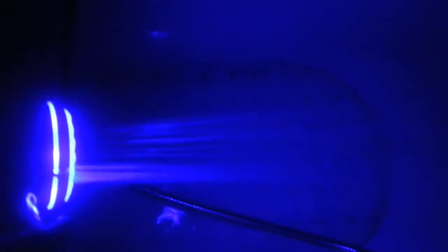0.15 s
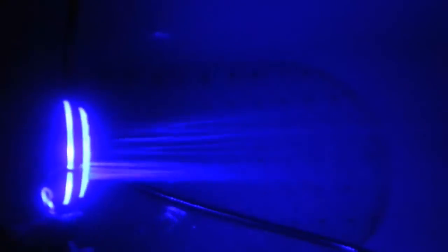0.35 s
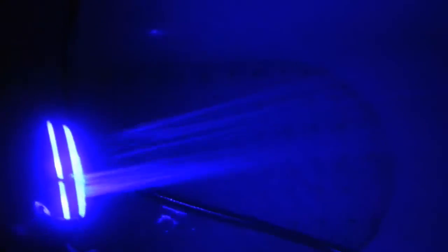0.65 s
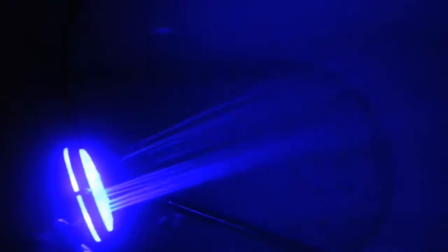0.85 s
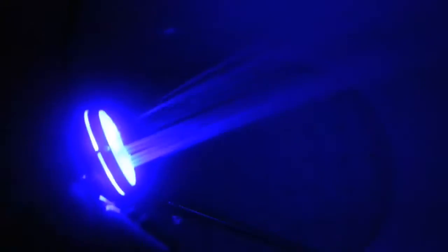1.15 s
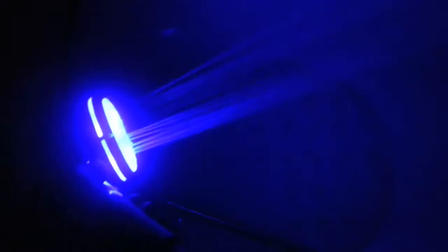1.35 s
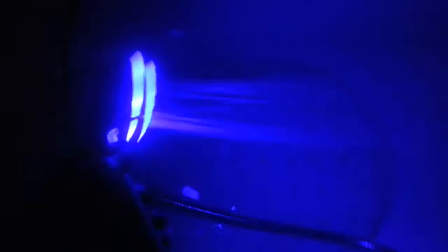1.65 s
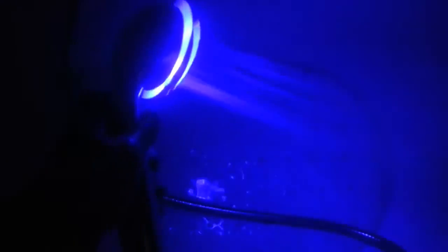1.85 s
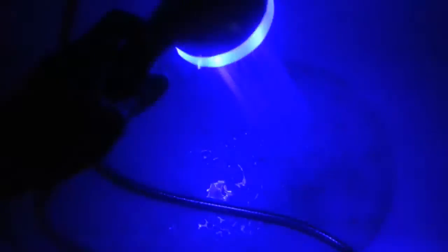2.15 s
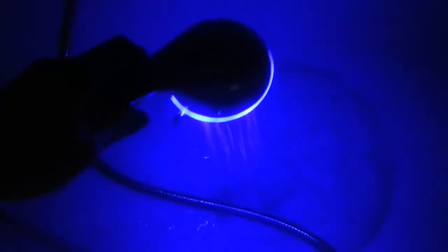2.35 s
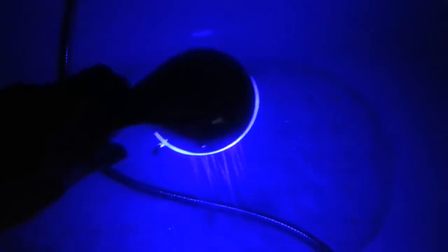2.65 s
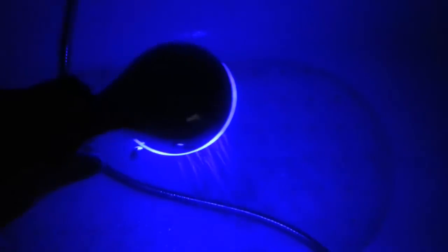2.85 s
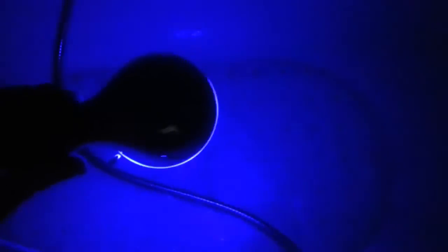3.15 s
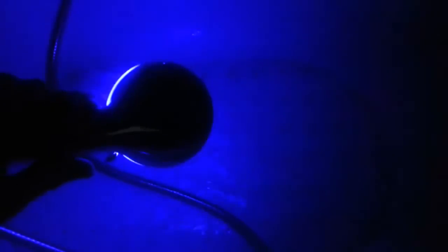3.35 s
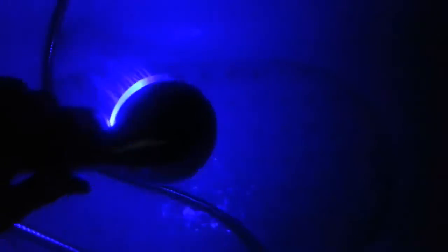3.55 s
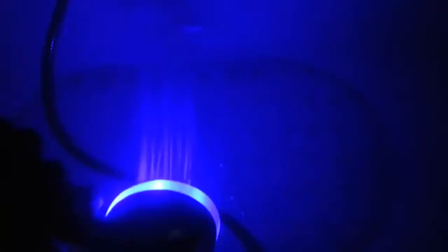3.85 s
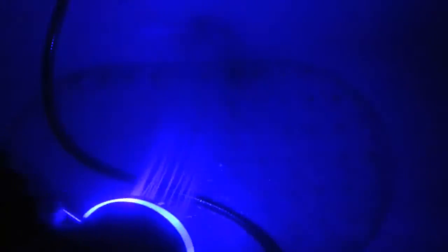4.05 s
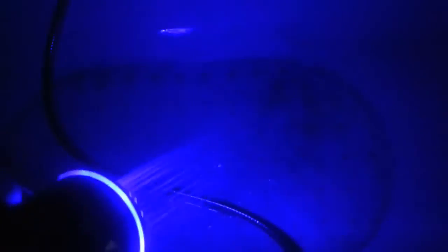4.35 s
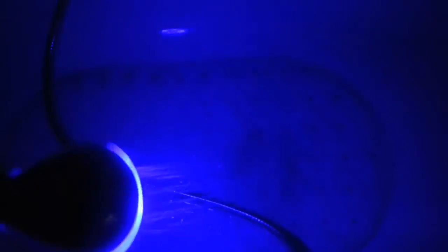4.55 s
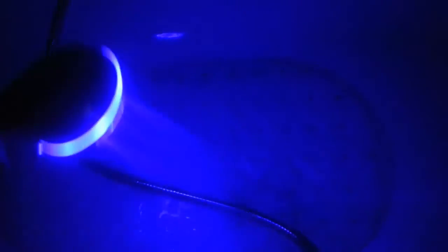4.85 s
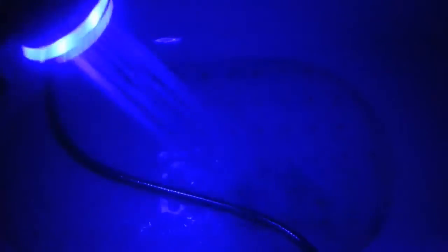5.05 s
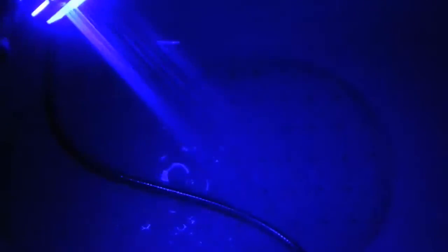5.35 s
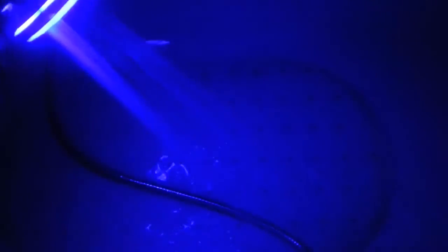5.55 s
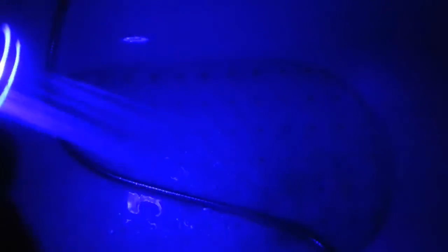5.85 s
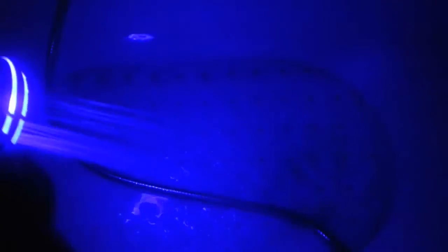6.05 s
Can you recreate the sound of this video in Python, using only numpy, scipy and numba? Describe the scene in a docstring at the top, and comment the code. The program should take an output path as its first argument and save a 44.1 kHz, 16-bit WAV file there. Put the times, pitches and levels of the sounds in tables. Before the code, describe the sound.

A shower head sprays into a bathtub close to a phone microphone. A bright, grainy hiss runs throughout, calmer until about two seconds, then louder surges as the jets sweep round. Hollow rolls drum on the tub, the hose knocks most clearly near two seconds, and short spurts spit. The sound leans right.

```python
"""Shower head over a bathtub

A hand-held shower head is swung over a bathtub with a rubber mat, close to a phone's microphone.
Noise made of random drops hisses in half-octave bands and swells as the jets sweep past; short spurts spit out.
The same kind of noise drums in the tub modes nearest the wetted spot, and noise bursts and blunt pushes make
the hose knock on the wall. Noise in two resonances hums as the head swings round; a drifting sine whines faintly."""
import sys
import numpy as np
from scipy import signal
from scipy.fft import rfft, irfft, next_fast_len
from scipy.io import wavfile
from scipy.ndimage import uniform_filter1d
from numba import njit

SR = 44100
rng = np.random.default_rng(int(sys.argv[2]) if len(sys.argv) > 2 else 0)


def transcribe(signal):
    """Save signal, clipped to [-1, 1], as a 16-bit WAV file at the path in sys.argv[1]."""
    frames = np.atleast_2d(signal).T
    limited = np.clip(frames, -1, 1)
    pcm = np.round(limited * 32767).astype(np.int16)
    wavfile.write(sys.argv[1], SR, pcm)


N = 273420


def undb(db):
    """Amplitude ratio of a level in dB."""
    return 10 ** (np.asarray(db) / 20)


def unit(x):
    """Scale to an RMS of 1 over all channels."""
    return x / np.sqrt(np.mean(x ** 2))


def curves(table):
    """Columns of a table joined by straight lines in time."""
    s, *columns = np.transpose(table)
    return [np.interp(np.arange(N) / SR, s, column) for column in columns]


def on_log(table, hz):
    """Read a table of (Hz, value) along a logarithmic frequency axis."""
    table_hz, values = np.transpose(table)
    return np.interp(np.log(hz), np.log(table_hz), values)


@njit
def svf(x, hz, width):
    """State-variable band-pass, gain 1 at a centre that may move."""
    y, band, low = np.empty(len(x)), 0., 0.
    for i in range(len(x)):
        g, damping = np.tan(np.pi * hz[i] / SR), width / hz[i]
        v = (band + g * (x[i] - low)) / (1 + g * (g + damping))
        band, low, y[i] = 2 * v - band, low + 2 * g * v, damping * v
    return y


def ring(x, hz, width):
    """The same resonance on both channels."""
    return np.array([svf(channel, hz * np.ones(len(channel)), 1. * width) for channel in x])


def walk(rate):
    """Random levels held 1 / rate s and slewed twice; spread near 1."""
    hold = int(SR / rate)
    steps = np.repeat(rng.standard_normal(N // hold + 1), hold)
    return 1.48 * uniform_filter1d(uniform_filter1d(steps, hold), hold)[:N]


def bumps(table):
    """Power of each event on a millisecond grid: up to its peak and down again, straight in dB."""
    s, peak_db, rise_s, fall_s = np.transpose(table)[:4, :, None]
    late = np.arange(0, N / SR + .001, .001) - s
    drop_db = 10 * np.where(late < 0, -late / rise_s, late / fall_s)
    return undb(2 * (peak_db - drop_db))


def smooth(x):
    """From the millisecond grid to samples."""
    return np.interp(np.arange(N) / SR, np.arange(len(x)) * .001, x)


def blend(level_db, colour, events):
    """Events add their power to an underlying sound; the louder one sets the colour (pitch or treble)."""
    power, bump = undb(2 * level_db), bumps(events)
    total = power + smooth(bump.sum(axis=0))
    event_colour = smooth(np.transpose(events)[4] @ bump)
    return 10 * np.log10(total), (power * colour + event_colour) / total


# How alike the two sides of the microphone hear the water.
# Each row: frequency in Hz, shared part of the power from 0 to 1.
STEREO_LIKENESS = [(125, .05), (250, .42), (1200, .42), (2200, .1), (5000, .02)]


def pair(own, shared, hz):
    """Left and right share part of their sound, more in the low middle."""
    likeness = np.clip(on_log(STEREO_LIKENESS, hz), 0, 1)
    return np.sqrt(1 - likeness) * own + np.sqrt(likeness) * shared


def water(per_s, spread_db, tail_s, drop_db):
    """Single drops, each a short noise burst, over the blur of countless fine ones: left, right, shared."""
    chance = rng.random((2, N))
    # the nozzles limit the size
    size_db = np.minimum(-spread_db * np.log(1 - chance[1]), 4 * spread_db)
    hits = (chance[0] < per_s / SR) * undb(2 * size_db)
    decay = np.exp(-2 * np.log(1000) / (tail_s * SR))  # 60 dB down after tail_s
    power = signal.lfilter([1], [1, -decay], hits)
    return rng.standard_normal((3, N)) * np.sqrt(1 + undb(2 * drop_db) * power / power.mean())


# The spray between swells, landing close to the microphone.
# Each row: time in seconds, level in dB, lift of the treble in dB, lift of the middle in dB, left minus right in dB.
SPRAY_BETWEEN_SWELLS = [(0, -34, 3.5, 0, -4), (.3, -37, 1, 1.5, -4.5), (.55, -35.5, 1.5, -0.5, -3.5),
                        (1.0, -40.5, 4, 0.5, -5), (1.5, -41.5, 5, 0.5, -5), (1.88, -44.5, 12, 3.5, -4),
                        (2.23, -39, 13, 2.5, -4), (2.8, -36, 2.5, 4.5, -5.5), (3.1, -39.5, -2, 1.5, -5.5),
                        (3.48, -38.5, 5, 0, -6), (3.75, -38, 5, 2.5, -5.5), (4.0, -42, 5, 1, -6.5),
                        (4.47, -47.5, 20, 4, -6), (4.7, -41, 3.5, 5, -6), (4.95, -39, 2.5, 5, -5.5),
                        (5.3, -39, 3, 3, -5), (5.5, -41.5, 1, 4, -5), (5.72, -42.5, 5, 2, -5.5),
                        (6.2, -41.5, 10, 4, -5)]
# Swells as the jets sweep past; rise and fall are the times over 10 dB.
# Each row: peak time in seconds, peak level in dB, rise in seconds, fall in seconds, lift of the treble in dB.
SWEEP_SWELLS = [(.25, -35.5, .04, 0.16, 8), (.37, -33.5, 0.11, 0.17, 2), (.57, -37.5, 0.044, 0.36, 5),
                (1.68, -37.5, 0.39, 0.16, -0.5), (2.05, -27, 0.067, 0.12, 2.5), (2.35, -30, 0.076, 0.08, 0),
                (2.5, -34, 0.061, 0.18, -3), (2.7, -35.5, 0.08, 0.31, 1), (2.97, -32.5, 0.056, 0.2, 3.5),
                (3.13, -35.5, 0.032, .08, 4), (3.28, -28, 0.13, 0.11, 1.5), (3.39, -31.5, 0.12, 0.12, -1),
                (3.53, -32.5, 0.049, 0.076, -1.5), (3.595, -33, 0.084, 0.078, 1),
                (4.07, -35.5, 0.029, 0.25, 6), (4.16, -33.5, 0.12, 0.41, 2), (4.52, -33.5, 0.036, 0.22, 3),
                (4.64, -34.5, 0.025, 0.12, 6), (5.28, -35.5, 0.047, 0.075, 1), (5.8, -35, 0.082, 0.24, 0),
                (6.02, -36.5, 0.027, 0.19, -0.5)]
# Underlying colour of the hiss before the lifts. Each row: frequency in Hz, relative density in dB per Hz.
HISS_COLOUR = [(20, -11.5), (332, -15), (516, -16.5), (572, -17.5), (843, -9.5), (1040, -11), (2080, -5),
               (2310, -4.5), (3300, -1), (4250, 3), (5150, 0), (6340, -5), (12400, -8), (14500, -8)]
SWELL_LOW_DB, SWELL_BASS_DB = -1, -2  # a swell is lighter in the middle and in the bass


def spray():
    """Half-octave bands of spatter; swells add to the underlying spray with their own colour."""
    between_db, treble_db, low_db, pan_db = curves(SPRAY_BETWEEN_SWELLS)
    total_db, mist_db = blend(between_db, treble_db, SWEEP_SWELLS)
    swell_share = 1 - undb(2 * (between_db - total_db))
    splash_db = low_db + SWELL_LOW_DB * swell_share
    size = next_fast_len(N)
    f = np.maximum(np.arange(size // 2 + 1) * SR / size, 1)
    source = rfft(water(per_s=500.0, spread_db=5.0, tail_s=0.022, drop_db=-8.5), size)
    source = pair(source[:2], source[2], f) * undb(on_log(HISS_COLOUR, f))
    out = 0
    surge_db = 0.65 * walk(14.)  # the jets sputter together
    for hz in 15 * 2 ** (np.arange(22) / 2):
        overlap = np.clip(1 - 2 * np.abs(np.log2(f / hz)), 0, 1)
        band = irfft(source * overlap, size)[:, :N]
        middle = np.clip(np.log2(3700 / hz) / .5, 0, 1) * np.clip(np.log2(hz / 250), 0, 1)
        high = np.clip(np.log2(hz / 5200) / 0.68, 0, 1)
        colour_db = middle * splash_db + high * mist_db
        bass_db = (hz < 100) * SWELL_BASS_DB * swell_share
        flicker_db = 1.01 * walk(12.)
        out = out + band * undb(colour_db + bass_db + surge_db + flicker_db)
    return unit(out) * undb(total_db + np.array([pan_db, -pan_db]) / 2)


def near(hz, centre_hz, octaves):
    """Modes close to the struck spot's own pitch ring most."""
    return np.exp(-.5 * (np.log2(hz / centre_hz) / octaves) ** 2)


def panel(source, modes, spot_hz, octaves, flicker_db):
    """The modes near the wetted spot, at an even total level before each one flickers."""
    weights = np.array([undb(db) * near(f, spot_hz, octaves) for f, w, db in modes]) + 1e-9
    weights = weights / np.sqrt(np.sum(weights ** 2, axis=0))
    out = 0
    for weight, (f, w, db) in zip(weights, modes):
        out = out + weight * undb(flicker_db * walk(12.0)) * unit(ring(source, f, w))
    return out


# Modes of the tub wall and of its floor. Each row: frequency in Hz, width in Hz, relative level in dB.
TUB_WALL_MODES = [(964, 43, -4), (1045, 54, 11), (1188, 260, 4), (1416, 84, -11.5), (1556, 47, -13.5),
                  (1822, 240, 8)]
TUB_FLOOR_MODES = [(468, 28, -1.5), (532, 39, -2), (584, 35, 2.5), (670, 130, 13.5)]
# Drumming on the wall between rolls, changing in level and pitch as the jets move.
# Each row: time in seconds, gain in dB, pitch of the wetted spot in Hz, gain of the side tones in dB.
WALL_DRUMMING = [(0, -60, 1470, -10), (.45, -71, 1320, -6), (1.9, -72, 1070, -2), (2.2, -49.5, 1140, -7),
                 (2.3, -52.5, 1530, -2.5), (2.82, -53.5, 1530, 2.5), (2.98, -54, 1160, -3),
                 (3.26, -54, 1205, -5), (3.4, -71, 1330, 4), (4.47, -57.5, 1150, -3.5),
                 (4.64, -50.5, 1050, -6), (4.72, -53.5, 1570, 1.5), (5.07, -53, 1416, 2),
                 (5.19, -46.5, 1545, -9), (5.4, -70, 1000, -4), (5.59, -61, 1450, -9),
                 (5.95, -50, 1420, -10), (6.2, -60, 1380, 1)]
# The tub floor under the jets. Each row: time in seconds, gain in dB, pitch of the wetted spot in Hz.
FLOOR_DRUMMING = [(0, -64, 540), (.35, -61, 534), (.8, -55.5, 508), (1.0, -60, 540), (2.0, -69, 500),
                  (2.41, -62, 516), (3.13, -56.5, 513), (3.71, -66.5, 504), (4.4, -58.5, 567),
                  (4.75, -62.5, 455), (5.0, -64, 557), (5.56, -62, 620), (6.2, -55, 620)]
# Rolls as the jets rake across the tub, on the floor under 750 Hz; rise and fall are the times over 10 dB.
# Each row: peak time in seconds, peak gain in dB, rise in seconds, fall in seconds, pitch in Hz.
RAKING_ROLLS = [(.26, -50, 0.097, 0.083, 1540), (1.77, -53.5, 0.16, 0.24, 517),
                (2.05, -49.5, 0.085, 0.2, 500), (2.11, -49, 0.038, 0.034, 1080),
                (2.295, -41.5, 0.043, 0.031, 1550), (2.345, -41.5, 0.028, 0.035, 1550),
                (2.47, -46, 0.05, 0.13, 1500), (4.51, -46, 0.045, 0.086, 620),
                (5.261, -39, 0.041, 0.066, 1504), (5.295, -45.5, 0.027, 0.048, 1210),
                (5.335, -45.5, 0.08, 0.054, 960), (5.63, -46.5, 0.02, 0.58, 1350),
                (5.805, -34.5, 0.051, 0.037, 1390), (5.845, -40, 0.04, 0.091, 1505)]
# Tones of the hollow beside the main one. Each row: ratio to its pitch, width in Hz, relative level in dB.
HOLLOW_SIDE_TONES = [(0.701, 45, -4.5), (1.41, 70, -0.5)]
# the hollow under the jets, gliding with the wetted spot; its wander is a fraction of the pitch
HOLLOW_WIDTH_HZ, HOLLOW_DB, HOLLOW_WANDER = 73, -5, .022


def drumming():
    """Longer, more even drops drum on the wall and the floor of the tub, in its modes and a gliding hollow."""
    level_db, spot_hz, side_db = curves(WALL_DRUMMING)
    wall_rolls = [roll for roll in RAKING_ROLLS if roll[4] >= 750]
    floor_rolls = [roll for roll in RAKING_ROLLS if roll[4] < 750]
    wall_db, wall_hz = blend(level_db, spot_hz, wall_rolls)
    floor_db, floor_hz = blend(*curves(FLOOR_DRUMMING), floor_rolls)
    source = water(per_s=260.0, spread_db=1.0, tail_s=0.077, drop_db=-9.0)
    source = pair(source[:2], source[2], 1100)
    hollow_hz = wall_hz * (1 + HOLLOW_WANDER * walk(15.))
    hollow = undb(HOLLOW_DB) * unit(ring(source, hollow_hz, HOLLOW_WIDTH_HZ))
    sides = 0
    for ratio, w, db in HOLLOW_SIDE_TONES:
        sides = sides + undb(db + side_db) * unit(ring(source, ratio * hollow_hz, w))
    wall = panel(source, TUB_WALL_MODES, wall_hz, octaves=.12, flicker_db=1.) + sides + hollow
    floor = panel(source, TUB_FLOOR_MODES, floor_hz, octaves=0.16, flicker_db=1.2)
    return wall * undb(wall_db) + floor * undb(floor_db)


WHINE_HZ, WHINE_DB, WHINE_WANDER = 1382, -69, .003  # from inside the head; wander is a fraction of the pitch


def whine():
    """A faint thin sine whose pitch drifts a little at random."""
    hz = WHINE_HZ * (1 + WHINE_WANDER * walk(0.99))
    return np.sqrt(2) * undb(WHINE_DB) * np.sin(2 * np.pi * np.cumsum(hz) / SR)


# Single spurts that spit out of the hiss, close to the microphone.
# Each row: start in seconds, peak level before panning in dB, pitch in Hz.
SPITTING_SPURTS = [(.572, -26, 8000), (2.448, -21.5, 7000), (2.501, -26, 11000), (2.521, -29, 6500),
                   (4.625, -23, 8000)]
SPURT_TAIL_S = .012  # time to fall 60 dB


def spurts():
    """Each spurt is a short spit of noise around its pitch, on the side of the spray."""
    out, t = np.zeros((2, N)), np.arange(SR // 20) / SR
    pan_db = curves(SPRAY_BETWEEN_SWELLS)[3]
    for s, db, hz in SPITTING_SPURTS:
        noise = rng.standard_normal((3, len(t)))
        burst = (2 * noise[2] + noise[:2]) * np.exp(-np.log(1000) * t / SPURT_TAIL_S)
        spit = ring(burst, hz, .5 * hz)
        i = int(s * SR)
        side_db = np.array([[pan_db[i]], [-pan_db[i]]]) / 2
        out[:, i:i + len(t)] += spit / np.abs(spit).max() * undb(db + side_db)
    return out


def early(x):
    """Scale to an RMS of 1 over the first 10 ms."""
    return x / np.sqrt(np.mean(x[:, :SR // 100] ** 2))


# The hose knocking on the wall.
# Each row: start in seconds, level of the first 10 ms before panning in dB, centre of the modes that ring in Hz,
# tail of the burst in seconds, crack against the ringing in dB, thud against the rattle in dB.
HOSE_KNOCKS = [(0.999, -50, 804, 0.17, -15, 0), (1.528, -50, 1540, 0.061, -11, 3),
               (1.744, -44.5, 940, 0.16, -10, -14), (2.031, -33.5, 1430, 0.092, 11, -1),
               (2.177, -28, 1070, 0.28, -3.5, -2.5)]
BLOW_S = 0.00032  # contact time of a knock


def knocks():
    """A blunt thud, then a dense rattle that dies away in the tub's modes, with a bright crack."""
    out, t = np.zeros((2, N)), np.arange(SR // 3) / SR
    for s, db, hz, tail_s, crack_db, thud_db in HOSE_KNOCKS:
        noise = rng.standard_normal((3, len(t)))
        envelope = np.exp(-np.log(1000) * t / tail_s) * np.minimum(t / .003, 1)
        burst = (noise[2] + 1.9 * noise[:2]) * envelope
        push = np.sin(np.pi * np.minimum(t / BLOW_S, 1)) * np.ones((2, 1))
        thud = ring(ring(push, hz, 0.31 * hz), hz, 0.31 * hz)
        body = 0
        for f, w, mode_db in [*TUB_WALL_MODES, *TUB_FLOOR_MODES]:
            body = body + undb(mode_db) * near(f, hz, 0.69) * ring(burst, f, 1.8 * w)
        crack = unit(ring(ring(burst, 2000, 2400), 2100, 2600))
        rattle = unit(body) + undb(crack_db) * crack
        i = int(s * SR)
        out[:, i:i + len(t)] += undb(db) * early(early(rattle) + undb(thud_db) * early(thud))
    return out


# A low hum while the head swings round. Each row: time in seconds, gain in dB.
SWING_HUM = [(1.72, -64), (1.75, -58), (2.16, -62.5)]
# Its resonances. Each row: frequency in Hz, width in Hz, relative level in dB.
HUM_RESONANCES = [(307, 10.6, 3.5), (990, 47, 3)]


def hum():
    """Noise in two narrow resonances, the lower one slightly stronger."""
    noise = rng.standard_normal((3, N))
    s, level_db = np.transpose(SWING_HUM)
    body = 0
    for f, w, db in HUM_RESONANCES:
        body = body + undb(db) * unit(ring(pair(noise[:2], noise[2], f), f, w))
    return body * undb(np.interp(np.arange(N) / SR, s, level_db, -120, -120))


TUB_PAN_DB = -3.5  # left minus right


def scene():
    """The tub, hose and head lean to the right; the spray and spurts follow their own panning."""
    tub = drumming() + whine() + knocks() + hum()
    tub = tub * undb(np.array([[TUB_PAN_DB], [-TUB_PAN_DB]]) / 2)
    return spray() + spurts() + tub


TOP_HZ = 14600


def record(dry):
    """A steep elliptic low-pass leaves the sound without treble above 14.6 kHz."""
    return signal.sosfilt(signal.ellip(14, .2, 75, TOP_HZ, fs=SR, output="sos"), dry)


dry = scene()
out = record(dry)
transcribe(out)
```